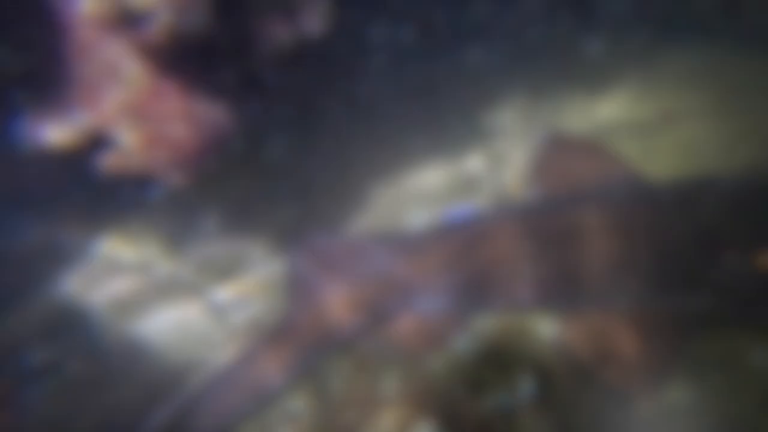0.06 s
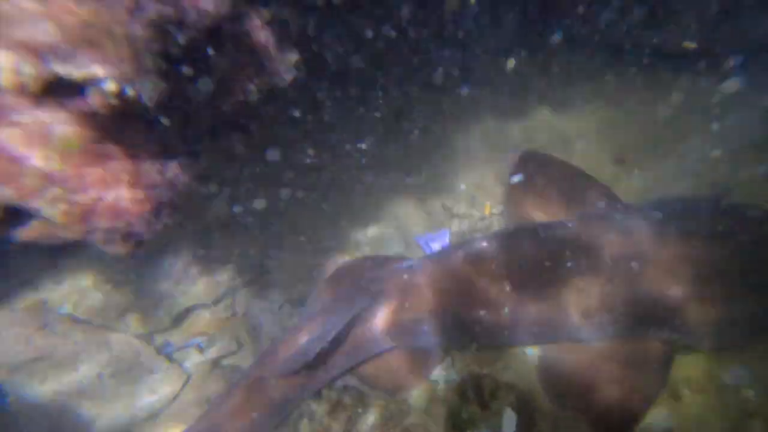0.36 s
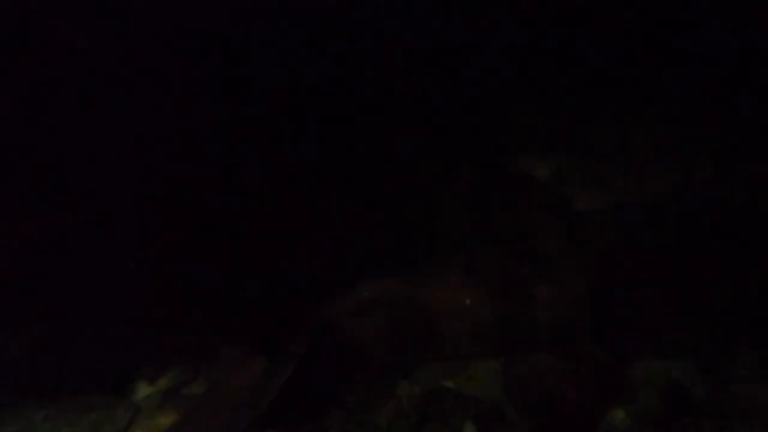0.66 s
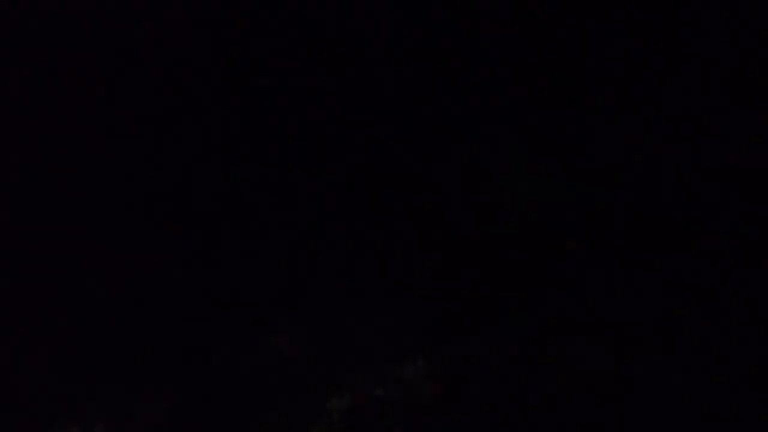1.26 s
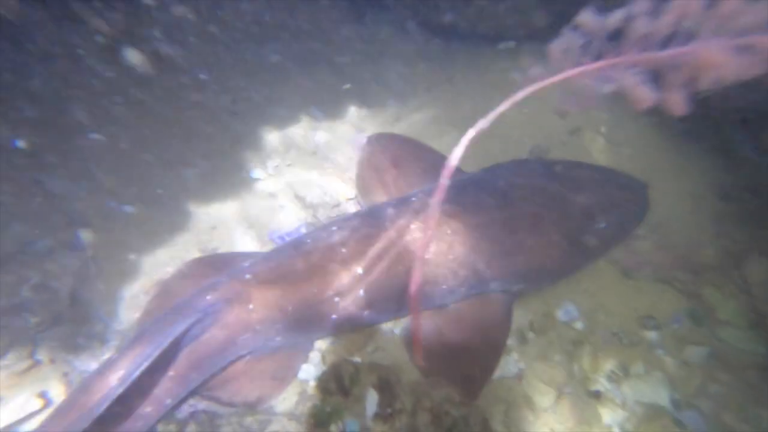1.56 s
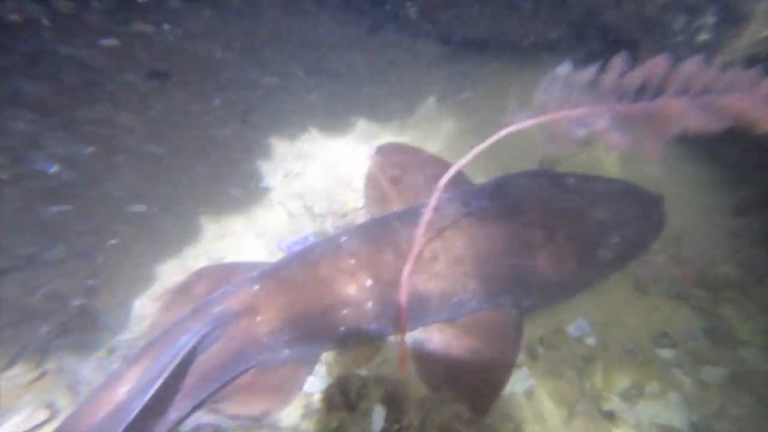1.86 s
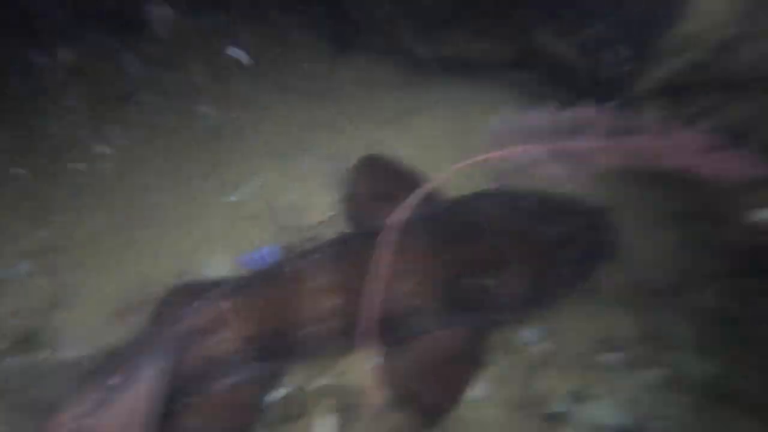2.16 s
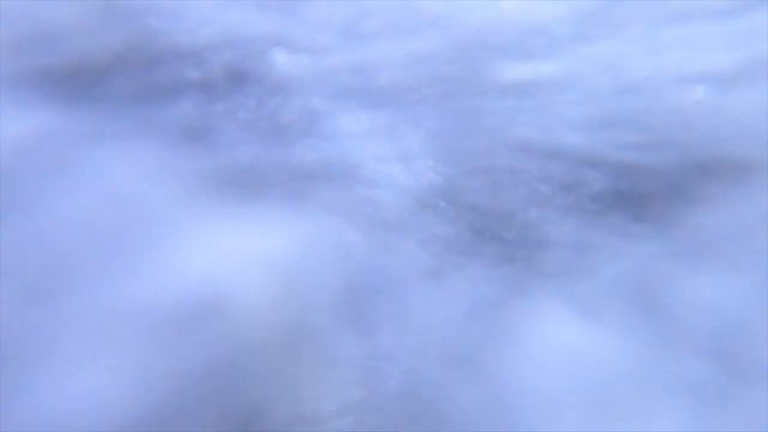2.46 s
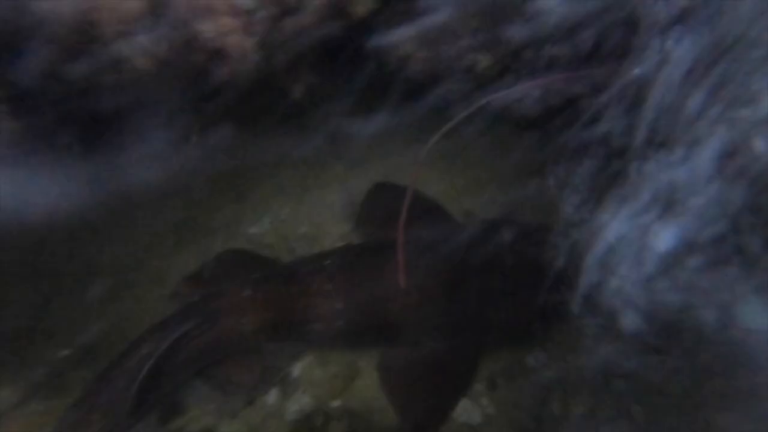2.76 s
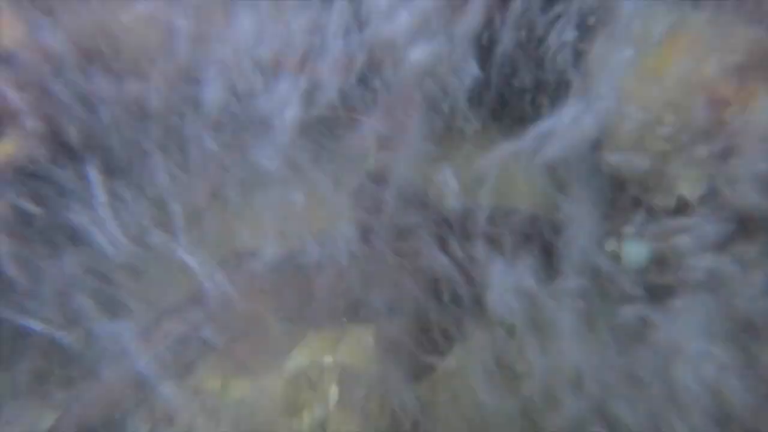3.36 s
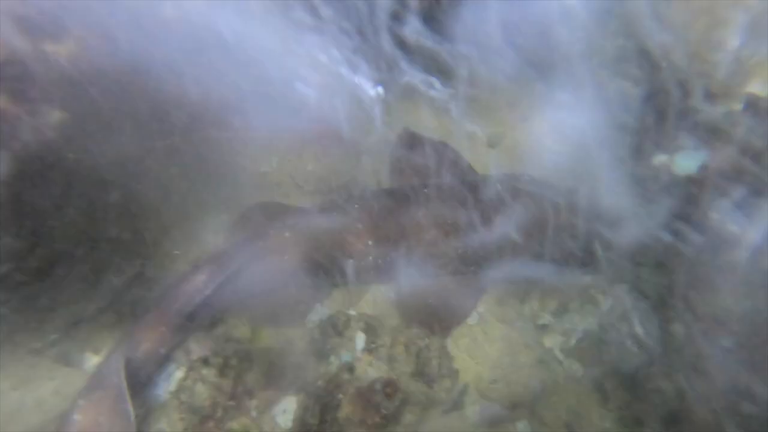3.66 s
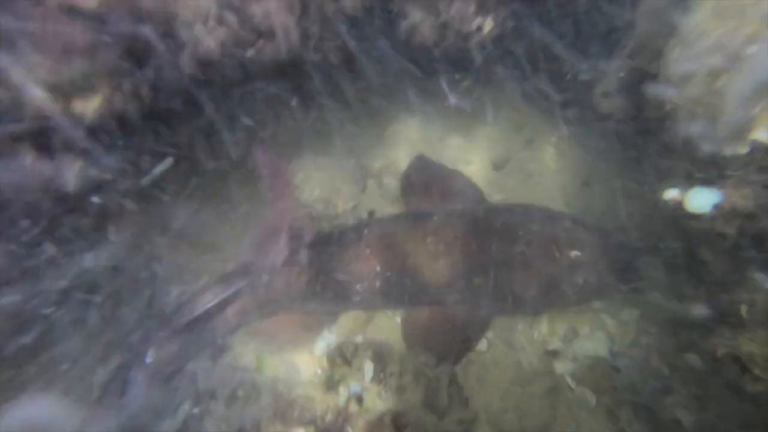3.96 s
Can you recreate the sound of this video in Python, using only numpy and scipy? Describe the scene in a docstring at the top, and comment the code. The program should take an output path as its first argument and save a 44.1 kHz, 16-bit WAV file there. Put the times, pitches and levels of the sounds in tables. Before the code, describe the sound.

Bubbles churn underwater, heard from inside a submerged camera housing. A short fizz, a few plinks and a soft thud open the first 0.3 seconds, then a low rumble and hollow wash slowly swell. At about 2 seconds a surge arrives with dull bumps: small bubbles rush past and crackle until around 2.7 seconds. Large bubbles glug and churn over the rumble, with faint pops, until 4 seconds.

```python
"""Bubbles glugging and churning in shallow water over rocks, heard inside a submerged camera housing.
A short fizz dies into low rumble and a dull wash, the flow ringing the hollow housing, with a few plinks.
Just after 2 s a surge arrives: small bubbles rush by and crackle on the housing, then large ones
glug and churn to the end. Each ringing bubble is a decaying sine that rises slightly in pitch."""
import sys
import numpy as np
from scipy import signal
from scipy.fft import rfft, irfft
from scipy.io import wavfile

SR = 44100
rng = np.random.default_rng(int(sys.argv[2]) if len(sys.argv) > 2 else 0)


def store_wav(level_fs):
    """Save 16-bit WAV to argv[1]."""
    pcm = np.round(np.clip(np.atleast_2d(level_fs), -1, 1) * 32767)
    wavfile.write(sys.argv[1], SR, pcm.T.astype(np.int16))


N = 176400
TIME = np.arange(N) / SR


def bubble(hz, t60_s, attack_s, rise):
    """A bubble swells, rings and dies; its pitch climbs by the fraction rise per t60_s."""
    t = np.arange(int(1.5 * t60_s * SR) + 2) / SR
    swell = 1 - np.exp(-(t / attack_s) ** 2)
    phase = 2 * np.pi * hz * t * (1 + rise * t / t60_s / 2)
    return swell * from_db(-60 * t / t60_s) * np.sin(phase)


def cloud(spectrum, per_s, cycles, rise, spread_db, attack_cycles=1, pitch_curve=((0, 1),)):
    """A steady swarm of bubbles, uniform in log pitch, each falling 60 dB over cycles; rms 1."""
    out = np.zeros(N)
    low_hz, high_hz = spectrum[0][0], spectrum[-1][0]
    draws = rng.random((20000, 4))
    for when, place, size, sign in draws[:int(per_s * N / SR)]:
        start_s = when * N / SR
        hz = low_hz * (high_hz / low_hz) ** place
        gain = at_hz(spectrum, hz) * from_db(spread_db * size) * np.sign(sign - .5)
        hz *= np.interp(start_s, *np.transpose(pitch_curve))
        add(out, start_s, gain * bubble(hz, cycles / hz, attack_cycles / hz, rise))
    return unit_rms(out)


# Largest bubbles: start_s, pitch_hz, relative_db, t60_s
GLUG_EVENTS = [(.025, 186.5, -24, 0.13), (1.942, 446, -11, .087), (1.965, 203.2, -10, 0.21),
               (2.122, 227, -14, 0.09), (2.174, 182.6, -9.5, .13), (2.213, 185, -3, 0.045),
               (2.218, 331, -9.5, 0.18), (2.261, 279, -6, 0.11), (2.268, 348, -9.5, 0.16),
               (2.317, 348.5, -5, 0.11), (2.361, 347, -5, .08), (2.389, 426, -12.5, 0.12),
               (2.407, 200.5, -7.5, .11), (2.454, 175.5, -8, .09), (2.521, 369, -9.5, 0.065),
               (2.586, 229, -12.5, 0.12), (2.691, 248, -11, 0.16), (2.719, 307.6, -9, 0.14),
               (2.729, 191.6, -12.5, 0.12), (2.77, 285, -11.5, 0.095), (2.9, 372.5, -13, 0.16),
               (2.929, 318, -10, 0.13), (2.974, 290, -13, 0.1), (3.021, 310, -15.5, 0.13),
               (3.071, 391.6, -12, 0.088), (3.088, 239.5, -8, .09), (3.166, 288, -13.5, 0.15),
               (3.198, 247.8, -8, 0.21), (3.227, 366.6, -7.5, 0.096), (3.305, 229, -12.5, 0.085),
               (3.366, 225, -2, 0.057), (3.443, 379, -7, 0.081), (3.535, 232, -11.5, .13),
               (3.633, 450, -12, 0.12), (3.701, 237, -7, 0.07), (3.722, 430, -11, .12),
               (3.783, 374.4, -8, 0.078), (3.886, 340, -13, 0.083), (3.899, 225, -11.5, 0.11),
               (3.977, 550, -18.5, 0.24)]

def glugs():
    """Large bubbles ring low, one by one."""
    out = np.zeros(N)
    for start_s, hz, db, t60_s in GLUG_EVENTS:
        add(out, start_s, from_db(db + 4) * bubble(hz, t60_s, attack_s=.0055, rise=.15))
    return out


def glug_activity(length_s=.12):
    """A 0..1 swell around each large bubble."""
    out = np.zeros(N)
    for start_s, *_ in GLUG_EVENTS:
        add(out, start_s - length_s / 4, signal.windows.hann(int(length_s * SR)))
    return np.minimum(out, 1)


# Churn envelope: time_s, level_db
CHURN_LEVEL = [(1.86, -100), (1.95, -26.5), (2.1, -26), (2.18, -15), (2.33, -18), (2.5, -17), (2.62, -19),
               (2.75, -18.5), (3.2, -18.5), (3.42, -15.5), (3.6, -18.5), (3.75, -19), (3.86, -15.5),
               (4, -22.5)]
# Bubble strength: unshifted_pitch_hz, gain_db
CHURN_SPECTRUM = [(140, -11), (200, 1.5), (290, 2.5), (420, 4), (510, -5), (640, -16.5), (950, -32),
                  (1400, -47.5)]
# Smaller bubbles ring higher: time_s, pitch_ratio
CHURN_SHIFT = [(1.95, 0.95), (2.28, 1.187), (2.7, 0.904), (3.0, 1.047), (3.3, 0.99), (3.8, 0.99),
               (4, 1.224)]

def churn():
    """A cloud of large bubbles rolls on, swelling slightly at each glug."""
    swarm = cloud(CHURN_SPECTRUM, per_s=740, cycles=10.1, rise=.15, spread_db=7.5,
                  pitch_curve=CHURN_SHIFT)
    return level(CHURN_LEVEL) * from_db(.5 * glug_activity()) * hold_rms(swarm, span_s=.07)


# Rush envelope: time_s, level_db
RUSH_LEVEL = [(1.9, -120), (2.05, -64.5), (2.11, -49.5), (2.15, -23), (2.21, -22), (2.26, -27),
              (2.31, -51.5), (2.45, -27.5), (2.6, -38.5), (2.8, -49.5), (3.17, -53.5), (3.4, -67),
              (3.8, -68.5), (3.88, -59)]
# Bubble strength: pitch_hz, gain_db
RUSH_SPECTRUM = [(600, 2), (950, 5.5), (1300, -6.5), (1800, -12.5), (2500, -24.5), (3300, -28.5),
                 (4000, -22.5)]

def rush():
    """Small bubbles stream by at the front of the surge."""
    return level(RUSH_LEVEL) * cloud(RUSH_SPECTRUM, per_s=3300, cycles=13, rise=.06, spread_db=8)


# Straggler envelope: time_s, relative_db
TRAIL_LEVEL = [(2.5, -120), (2.64, -52), (2.74, -63.5), (2.82, -48), (2.9, -47.5), (2.97, -73.5),
               (3.15, -60.5), (3.27, -73.5), (4, -76.5)]
# Bubble strength: pitch_hz, gain_db
TRAIL_SPECTRUM = [(1300, 0), (2000, -2), (2700, -9.5), (3600, -10.5)]

def trail():
    """Small stragglers behind the surge, louder as each glug sheds a few."""
    swarm = cloud(TRAIL_SPECTRUM, per_s=730, cycles=12, rise=.065, spread_db=29.5, attack_cycles=1.6)
    swell_db = 8 * glug_activity() - 12
    return level(TRAIL_LEVEL) * from_db(swell_db) * swarm


# Dips in the surge: centre_s, length_s, gain_db
SURGE_LULLS = [(2.018, 0.032, -14), (2.106, 0.026, -8), (2.623, 0.035, -12), (3.262, 0.062, -2.5),
               (3.42, 0.065, -3.5), (3.478, 0.02, -12.5), (3.666, 0.022, -6.5), (3.842, 0.077, -7),
               (3.945, 0.053, -5.5)]

def surge(lowpass_hz=3720):
    """The three bubble clouds let up together between gulps."""
    lull_db = np.zeros(N)
    for centre_s, length_s, db in SURGE_LULLS:
        add(lull_db, centre_s - length_s / 2, db * signal.windows.tukey(int(length_s * SR), .5))
    swarm = from_db(lull_db) * (churn() + rush() + trail())
    return butterworth(swarm, lowpass_hz, order=8)


# Smaller single bubbles: start_s, pitch_hz, level_db, t60_s
PLINK_EVENTS = [(.004, 2430, -39, 0.029), (.039, 856, -17, 0.054), (0.116, 1050, -41, 0.024),
                (.186, 513, -19.5, 0.047), (.188, 1360, -30, 0.03), (.28, 1880, -40, .018),
                (.336, 3420, -51, 0.01), (.943, 1850, -44.5, 0.0069), (1.046, 2500, -39, 0.016),
                (1.054, 1312, -26, 0.033), (1.394, 1890, -38.5, 0.024), (2.131, 2460, -25, .022),
                (2.221, 1207, -19.5, 0.033), (3.113, 927, -27, 0.036)]

def plinks(splash_db=-7, splash_t60_s=.014):
    """Each bubble pinches off with a wet splash, then rings."""
    out = np.zeros(N)
    splash_decay = from_db(-60 * TIME[:SR // 20] / splash_t60_s)
    for start_s, hz, db, t60_s in PLINK_EVENTS:
        burst = splash_decay * rng.standard_normal(len(splash_decay))
        splash = butterworth(burst, [hz * .6, hz * 1.15], order=4, kind="band")
        add(out, start_s, from_db(db + splash_db) * splash / np.abs(splash).max())
        add(out, start_s, from_db(db) * bubble(hz, t60_s, attack_s=.00096, rise=.2))
    return out


# Crackle bursts: start_s, length_s, level_db
CRACKLE_BURSTS = [(2.318, 0.026, -33), (2.351, 0.002, -24.5), (2.359, 0.022, -26), (2.388, 0.012, -23),
                  (2.402, 0.032, -39), (2.427, 0.05, -27), (2.47, 0.042, -39), (2.504, 0.04, -27),
                  (2.567, 0.036, -29.5), (2.623, 0.05, -37), (2.671, 0.035, -46.5)]
# Continuous crackle under them: time_s, level_db
CRACKLE_LEVEL = [(1.85, -120), (1.95, -58), (2.3, -46.5), (2.33, -39), (2.44, -30.5), (2.58, -36),
                 (2.7, -50.5), (2.76, -71)]
# Crackle spectrum: freq_hz, gain_db
CRACKLE_SPECTRUM = [(250, -7.5), (500, 10), (950, 1.5), (1400, -5.5), (2500, -17), (4000, -27), (6000, -40),
                    (8500, -57.5), (11000, -58), (16000, -59)]

def crackle():
    """Bubbles break on the housing in dense bursts."""
    envelope = level(CRACKLE_LEVEL)
    for start_s, length_s, db in CRACKLE_BURSTS:
        add(envelope, start_s, from_db(db) * signal.windows.tukey(int(length_s * SR), .5))
    return envelope * coloured(clicks(per_s=1700, spread_db=2), CRACKLE_SPECTRUM)


# Snaps in the crackle: start_s, level_db
SNAP_EVENTS = [(2.329, -36), (2.368, -40), (2.3732, -28), (2.379, -34), (2.411, -46)]

def snaps():
    """The sharpest breaks on the housing ring for only a few cycles."""
    out = np.zeros(N)
    for start_s, db in SNAP_EVENTS:
        add(out, start_s, from_db(db) * bubble(hz=5000, t60_s=.0004, attack_s=.00002, rise=0))
    return out


# Lone pops: start_s, relative_db
POP_EVENTS = [(.64, -59), (1.945, -51.5), (1.974, -46), (2.7711, -49.5), (2.899, -50), (2.83, -45),
              (2.9796, -45), (3.222, -44), (3.3134, -38.5), (3.366, -39.5), (3.445, -39), (3.539, -43),
              (3.614, -48), (3.695, -41.5), (3.757, -48), (3.8866, -40)]
# Fizz around each pop: freq_hz, gain_db
PUFF_SPECTRUM = [(1000, 4), (2000, -9), (3300, -11.5), (4500, -19.5), (7000, -21), (12000, -29.5)]

def pops(centre_hz=2300, spread_octaves=.4, lowpass_hz=3800, puff_s=.035):
    """Lone bubbles break on the housing, each in a soft puff of fizz."""
    rings, puff_envelope = np.zeros(N), np.zeros(N)
    for start_s, db in POP_EVENTS:
        hz = centre_hz * 2 ** (spread_octaves * rng.uniform(-1, 1))
        add(rings, start_s, from_db(db + 3.5) * bubble(hz, t60_s=.0012, attack_s=.0002, rise=0))
        puff = from_db(db - 22.5) * signal.windows.hann(int(puff_s * SR))
        add(puff_envelope, start_s - puff_s / 3, puff)
    puffs = puff_envelope * coloured(clicks(per_s=1500, spread_db=6), PUFF_SPECTRUM)
    return butterworth(rings, lowpass_hz, order=2) + puffs


# Squirt envelope: time_s, level_db
SQUIRT_LEVEL = [(2.06, -110), (2.11, -59.5), (2.133, -39.5), (2.15, -48.5), (2.21, -52.5), (2.25, -64),
                (2.32, -110)]
# Squirt spectrum: freq_hz, gain_db
SQUIRT_SPECTRUM = [(1900, -21), (2300, 1.5), (2500, 4.5), (2800, -8), (3200, -17), (3700, -16), (4200, -33)]

def squirt():
    """A brief jet of like-sized bubbles rings high as the surge arrives."""
    return level(SQUIRT_LEVEL) * coloured(clicks(per_s=1100, spread_db=4), SQUIRT_SPECTRUM)


# Opening fizz envelope: time_s, level_db
FIZZ_LEVEL = [(0, -29.5), (.06, -39.5), (.13, -39.5), (.19, -43.5), (.28, -57), (.315, -63), (.5, -111.5)]
# Hiss spectrum: freq_hz, gain_db
HISS_SPECTRUM = [(300, -1.5), (700, 4), (1100, -9), (1600, -11), (2500, -15), (3200, -23.5), (4800, -30),
                 (6500, -42.5), (9000, -56)]
# Bubble strength: pitch_hz, gain_db
FIZZ_RING_SPECTRUM = [(650, 0.5), (1200, 2), (2500, -12.5), (4500, -17)]

def fizz():
    """Fine bubbles hiss, ring and die away."""
    hiss = coloured(rng.standard_normal(N), HISS_SPECTRUM)
    rings = cloud(FIZZ_RING_SPECTRUM, per_s=550, cycles=38, rise=.072, spread_db=13.5, attack_cycles=.63)
    return level(FIZZ_LEVEL) * (hiss + from_db(-3.5) * rings)


# Spray spectrum: freq_hz, gain_db
SPRAY_SPECTRUM = [(3500, -10), (5500, -8), (7500, -5), (9000, -28), (11000, -17), (13000, -31)]

def spray(start_s=.059, end_s=.11, fade_s=.033, level_db=-56.5):
    """A brief bright hiss tops the opening fizz."""
    gate = np.interp(TIME, [start_s - fade_s, start_s, end_s, end_s + fade_s], [0, 1, 1, 0])
    return from_db(level_db) * gate * coloured(rng.standard_normal(N), SPRAY_SPECTRUM)


# Housing thuds: start_s, pitch_hz, level_db
BUMP_EVENTS = [(.145, 35, -7.5), (1.969, 113.3, -10.5), (2.027, 91.5, -5.5), (2.058, 91.6, -5.5),
               (2.116, 109, -3.5), (2.145, 68, -6), (2.239, 87, -12.5), (2.495, 101.5, -5.5),
               (2.64, 158, -11), (2.88, 123, -8.5), (3.731, 59, -13)]

def bumps():
    """The jostled housing thuds softly."""
    out = np.zeros(N)
    for start_s, hz, db in BUMP_EVENTS:
        add(out, start_s, from_db(db) * bubble(hz, t60_s=.15, attack_s=.0087, rise=0))
    return out


# Flow strength: time_s, level_db
FLOW_LEVEL = [(0, -33), (.15, -41.5), (.2, -27.5), (.32, -32), (.55, -29.5), (.88, -26.5), (1.02, -23),
              (1.16, -19.5), (1.38, -21.5), (1.6, -24), (1.9, -22), (2.0, -19), (2.3, -18), (2.7, -26.5),
              (3.1, -38.5), (3.4, -39.5)]
# Housing resonances: freq_hz, gain_db
FLOW_SPECTRUM = [(50, -30.5), (88, -4.5), (140, 1.5), (215, -3), (255, -7.5), (322, -13), (395, -3),
                 (465, -1.5), (540, -9.5), (600, -16.5), (710, -23.5), (810, -19.5), (910, -23),
                 (1090, -23.5), (1240, -42.5), (1400, -42), (1600, -60), (2400, -65), (3700, -76.5)]

def flow(flutter_db=.48):
    """Passing water rings the hollow resonances of the housing."""
    turbulence = rng.standard_normal(N) * from_db(flutter_db * drift(rate_hz=31))
    return level(FLOW_LEVEL) * coloured(turbulence, FLOW_SPECTRUM)


# Rumble envelope: time_s, level_db
BUFFET_LEVEL = [(0, -26.5), (.2, -30), (.45, -30.5), (.85, -35), (1.3, -26.5), (1.85, -27.5), (2.0, -20.5),
                (2.2, -15), (2.5, -19.5), (2.8, -22), (3.1, -23), (3.38, -27), (3.7, -20), (3.87, -23),
                (4, -22)]
# Rumble spectrum: freq_hz, gain_db
BUFFET_SPECTRUM = [(10, 2), (25, -2.5), (60, -2.5), (95, -5), (140, -11), (250, -33), (600, -88)]

def buffet():
    """Eddies buffet the housing with a low rumble."""
    return level(BUFFET_LEVEL) * coloured(rng.standard_normal(N), BUFFET_SPECTRUM)


# Spatter envelope: time_s, level_db
SPATTER_LEVEL = [(1.9, -100), (1.945, -68), (2.06, -76), (2.18, -67.5), (2.3, -65.5), (2.4, -100)]
# Spatter spectrum: freq_hz, gain_db
SPATTER_SPECTRUM = [(1500, 0.5), (3300, -7), (5500, -17.5)]

def spatter():
    """Sparse, faint ticks lead into the surge."""
    return level(SPATTER_LEVEL) * coloured(clicks(per_s=120, spread_db=2), SPATTER_SPECTRUM)


# Seethe envelope: time_s, level_db
SEETHE_LEVEL = [(.3, -74.5), (.85, -76.5), (1.0, -73.5), (1.19, -60.5), (1.35, -74.5), (1.65, -70),
                (1.9, -62), (2.15, -61), (2.3, -110)]
# Seethe spectrum: freq_hz, gain_db
SEETHE_SPECTRUM = [(1300, 1.5), (1700, -6.5), (2400, -8.5), (3000, -23), (3800, -29), (5000, -50)]

def seethe():
    """Fine bubbles seethe faintly in the flow."""
    return level(SEETHE_LEVEL) * coloured(clicks(per_s=5400, spread_db=1.5), SEETHE_SPECTRUM)


def from_db(db):
    """Decibels to gain."""
    return 10 ** (np.asarray(db) / 20)


def unit_rms(x):
    """Scale to rms 1."""
    return x / np.sqrt(np.mean(x ** 2) + 1e-20)


def hold_rms(x, span_s):
    """Hold the running rms near 1, so a swarm has no gaps."""
    window = signal.windows.hann(int(span_s * SR))
    power = signal.fftconvolve(x ** 2, window / window.sum(), "same")
    return x / np.sqrt(np.abs(power) + 1e-6)


def level(rows):
    """Gain over time from rows of time_s, level_db."""
    return from_db(np.interp(TIME, *np.transpose(rows)))


def at_hz(spectrum, hz):
    """Gain at hz from rows of freq_hz, gain_db."""
    freq_hz, gain_db = np.transpose(spectrum)
    return from_db(np.interp(np.log(hz), np.log(freq_hz), gain_db))


def coloured(x, spectrum):
    """Filter x by a spectrum, rolling off beyond its ends; rms 1."""
    hz = np.fft.rfftfreq(N, 1 / SR) + 1e-3
    skirts = np.minimum(1, hz / spectrum[0][0]) ** 2 * np.minimum(1, spectrum[-1][0] / hz) ** 4
    return unit_rms(irfft(rfft(x) * at_hz(spectrum, hz) * skirts, N))


def butterworth(x, hz, order, kind="low"):
    """Causal filter with a flat passband."""
    return signal.sosfilt(signal.butter(order, hz, kind, fs=SR, output="sos"), x)


def drift(rate_hz):
    """Smooth random wander; rms 1."""
    hz = np.fft.rfftfreq(N, 1 / SR)
    response = (hz > 2) / (1 + (hz / rate_hz) ** 2)
    return unit_rms(irfft(rfft(rng.standard_normal(N)) * response, N))


def clicks(per_s, spread_db):
    """Random impulses of uneven size."""
    sizes = from_db(spread_db * np.minimum(rng.exponential(1, N), 4))
    signs = rng.choice([-1, 1], N)
    return sizes * signs * (rng.random(N) < per_s / SR)


def add(out, start_s, sound):
    """Mix sound into out at start_s."""
    i = int(np.clip(start_s * SR, 0, N - 1))
    out[i:i + len(sound)] += sound[:N - i]


def scene(floor_db=-102):
    """All sources sum at one microphone in the housing."""
    wash = buffet() + flow() + seethe() + from_db(floor_db) * rng.standard_normal(N)
    bubbles = squirt() + surge() + glugs() + plinks()
    on_housing = bumps() + pops() + snaps() + spatter() + crackle()
    return (wash + bubbles + on_housing + fizz() + spray())[None]


def record(dry, limit=.95, fade_s=.003, stopband_hz=15800):
    """Soft limiter, fade-in and steep lowpass."""
    rounded = dry / (1 + (dry / limit) ** 8) ** (1 / 8)
    fade_in = np.minimum(TIME / fade_s, 1)
    lowpass = signal.cheby2(12, 70, stopband_hz, fs=SR, output="sos")
    return signal.sosfilt(lowpass, fade_in * rounded)


dry = scene()
out = record(dry)
store_wav(out)
```